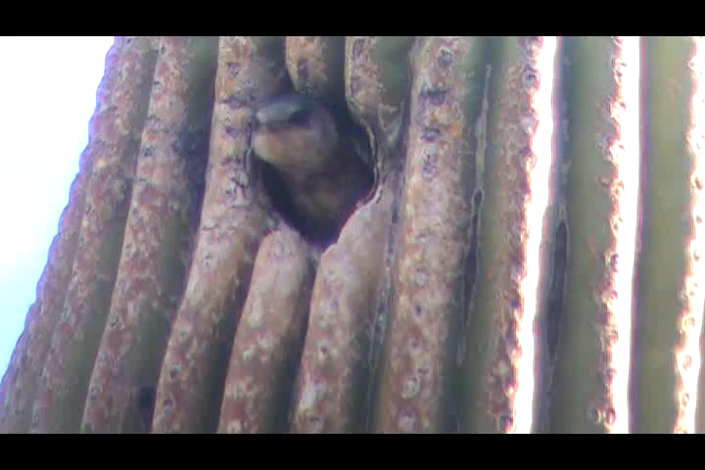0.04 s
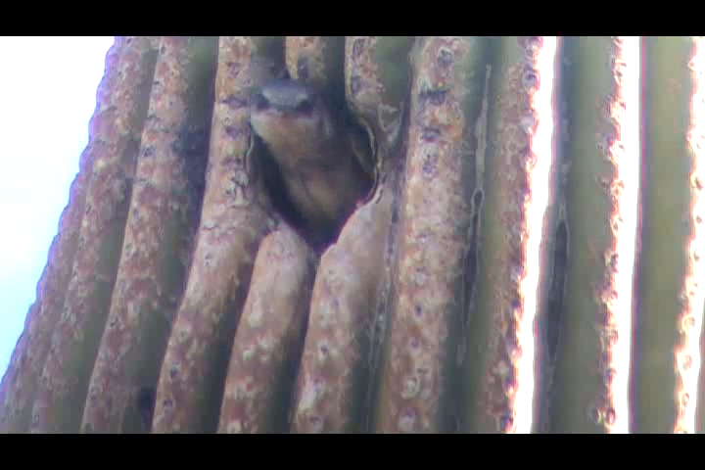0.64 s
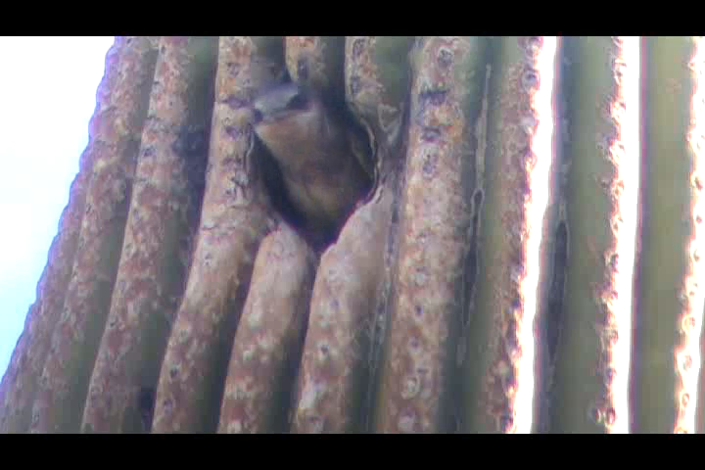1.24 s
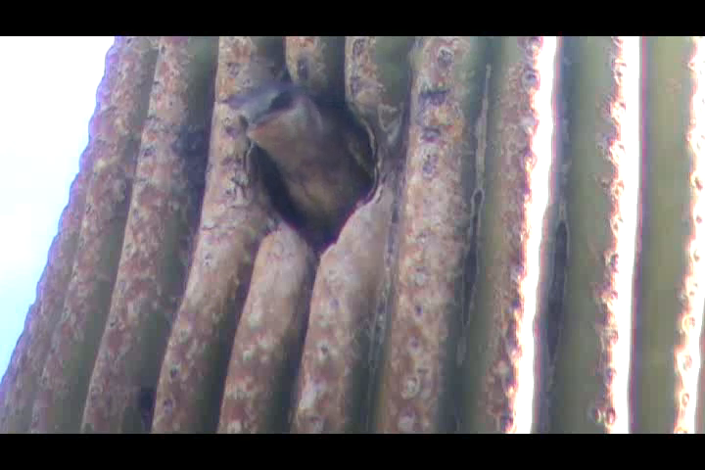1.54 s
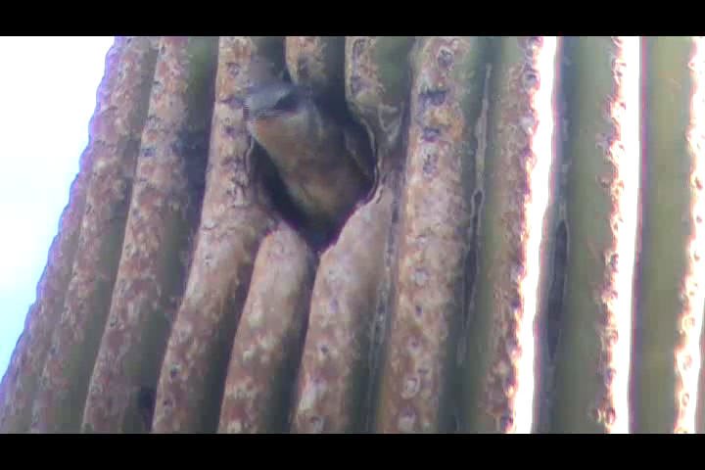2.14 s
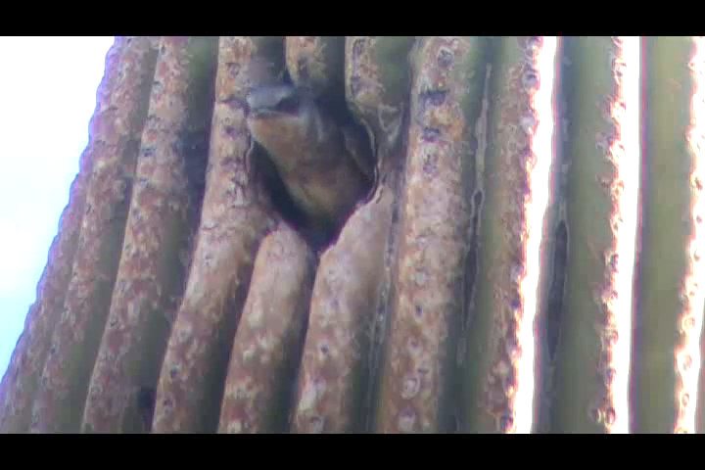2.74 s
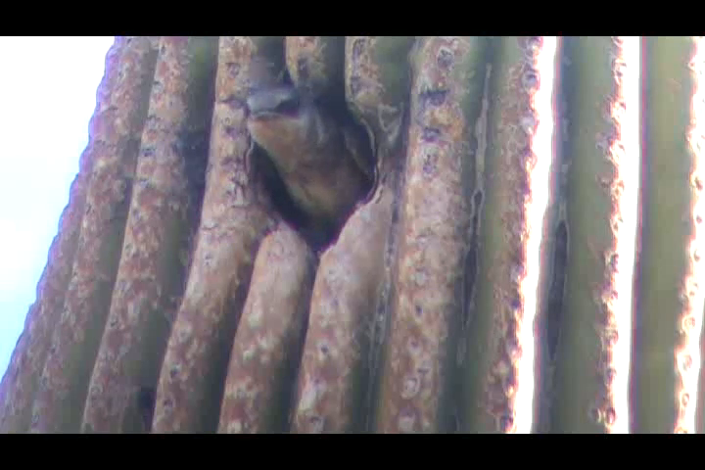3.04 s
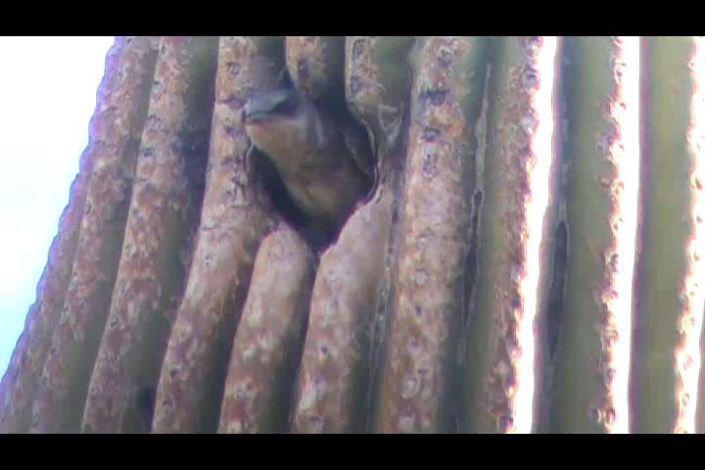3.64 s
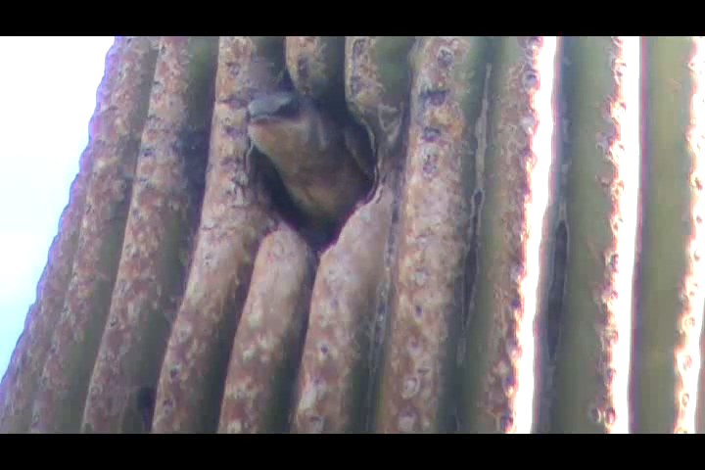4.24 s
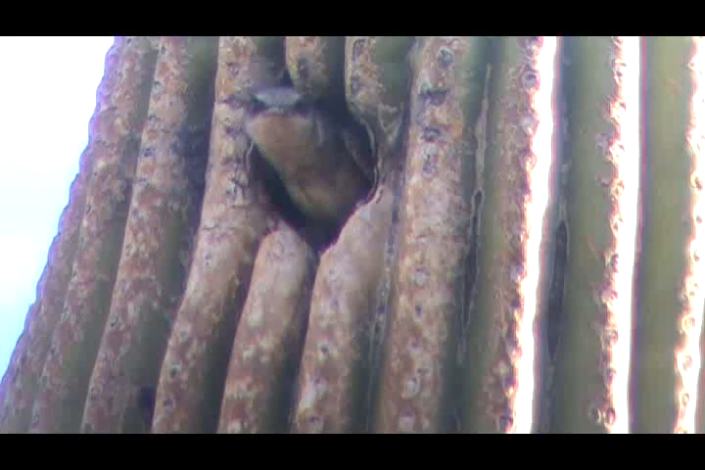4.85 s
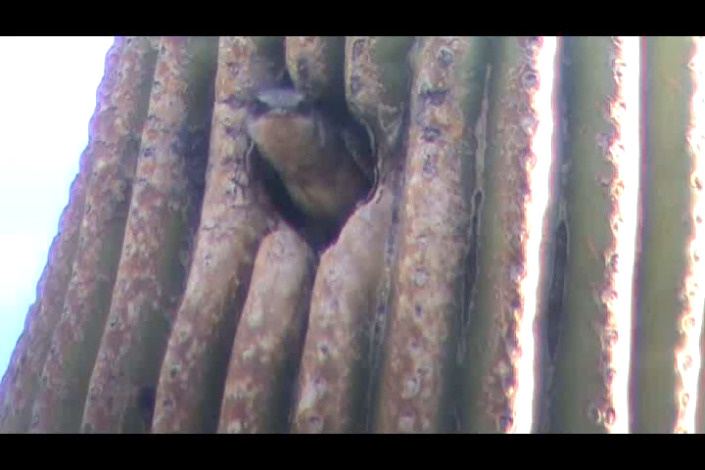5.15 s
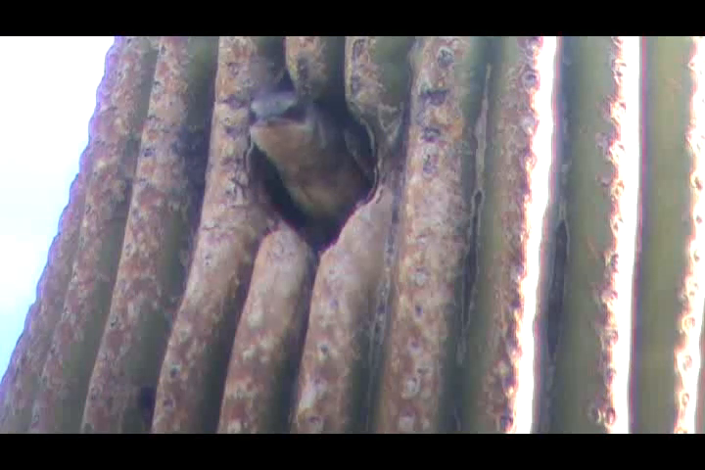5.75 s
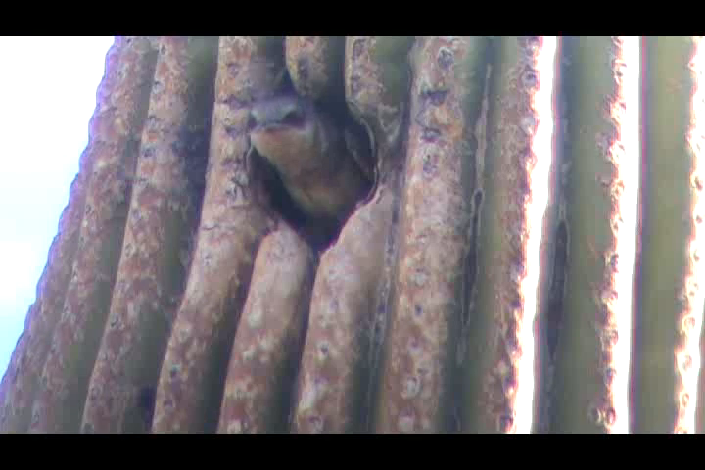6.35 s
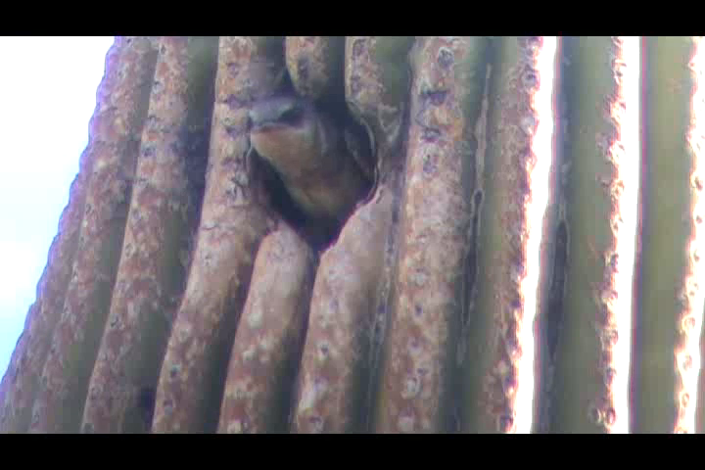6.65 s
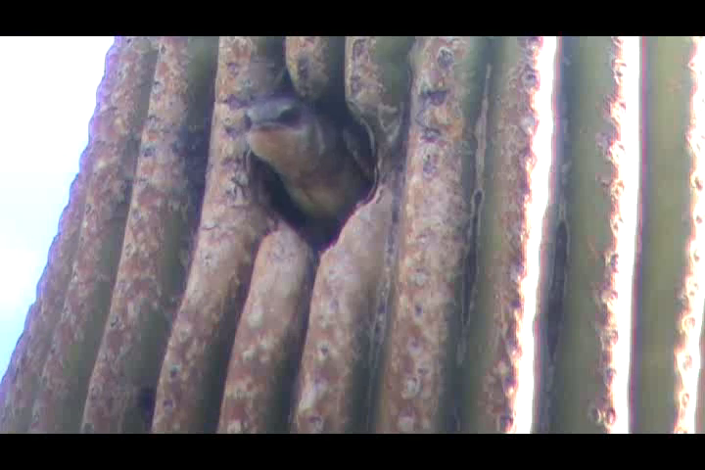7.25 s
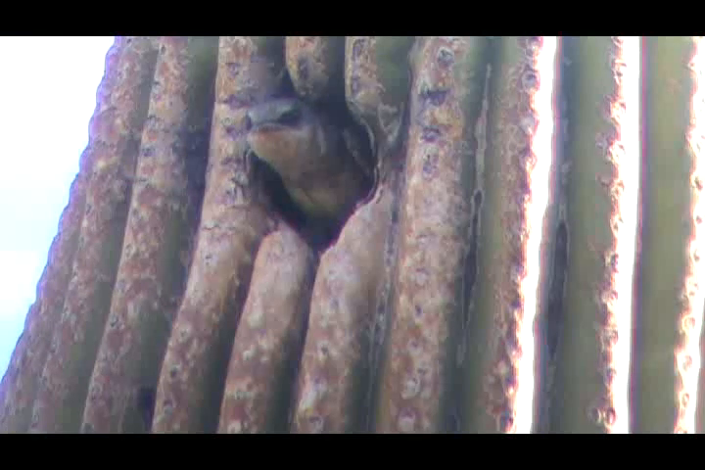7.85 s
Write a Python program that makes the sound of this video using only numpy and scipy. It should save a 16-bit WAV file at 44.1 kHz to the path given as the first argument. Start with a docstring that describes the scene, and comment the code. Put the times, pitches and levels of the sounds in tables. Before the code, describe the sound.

A nearby bird gives three sharp, high chips in the first second, each a tiny whistle that plunges in pitch. A single chip follows, then a quick pair, and a last one near the end. Other birds call faintly further off and a few thin, dry ticks sound nearby. The setting is open air with little echo, over a steady hum of distant traffic and a faint hiss.

```python
"""At a nest hole in a tall cactus, a bird gives seven sharp chips, each a held whistle that plunges at
the end. Its throat boosts whichever overtone is near 5 kHz, and the cactus ribs and the ground scatter
every chip into tiny echoes. Other birds call faintly further off and a few thin ticks sound nearby.
Behind it all are a faint hiss and the steady hum of distant traffic: rumble, tyre roar and engines."""
import sys
import numpy as np
from scipy import signal
from scipy.fft import rfft, irfft
from scipy.io import wavfile
from scipy.ndimage import uniform_filter1d

SR = 44100
rng = np.random.default_rng(int(sys.argv[2]) if len(sys.argv) > 2 else 0)


def wav_record(signal):
    """Record a signal, one row per channel, as 16-bit PCM in the file named by sys.argv[1]."""
    frames = np.transpose(np.atleast_2d(signal))
    bounded = np.clip(frames, -1, 1)
    # unit amplitude maps onto the largest positive 16-bit level
    quanta = np.round(bounded * 32767).astype(np.int16)
    wavfile.write(sys.argv[1], SR, quanta)


N = 357651
TIME = np.arange(N) / SR

# A "colour" says how strong each frequency is. Levels in a table are relative to one another.
# colour of the low traffic rumble: frequency_hz, gain_db
RUMBLE_COLOUR = [(12, -32), (25, -19), (45, -9), (70, -2.5), (115, 0.5), (160, -5.5), (230, -7), (310, -16),
                 (420, -24.5), (800, -67)]
# colour of the tyre roar: frequency_hz, gain_db
TYRE_COLOUR = [(180, -33), (300, -9.5), (412, -7), (487, -5.5), (560, -3), (824, -0.5), (1540, -9.5),
               (2810, -22.5), (3200, -28), (4160, -48.5), (7040, -120)]
# how the low and high parts of the tyre roar rise and fall: time_s, low_db, high_db
TYRE_LEVELS = [(0.0, -48, -55.5), (0.97, -46, -52.5), (2.42, -49, -53.5), (3.88, -48, -54),
               (4.56, -47.5, -52.5), (5.35, -48.5, -56), (8.11, -47, -54)]
# colour of the faint hiss: frequency_hz, gain_db
HISS_COLOUR = [(2200, -34), (3000, -1), (4000, 0.5), (6000, -3), (8000, -5.5), (10500, -5), (12000, -8)]
# how alike the background is on the left and right (1 is fully alike): frequency_hz, likeness
STEREO_LIKENESS = [(120, 1), (250, .93), (500, .9), (900, .8), (1600, .62), (3100, .25), (6000, .3),
                   (11700, .79)]
# how far the background's waves on the left run ahead of the right: frequency_hz, lead_radians
LEFT_LEAD = [(30, .05), (100, .18), (250, .42), (600, .76), (2000, .62), (5300, .05)]

# thin dry ticks: start_s, level_db
TICK_EVENTS = [(0.042, -48), (1.565, -49), (1.6043, -51), (3.0275, -51), (3.1946, -51), (3.3792, -49.5),
               (3.5678, -51), (5.3821, -48), (5.6057, -49), (5.7882, -51), (6.3149, -47)]
# colour of a tick: frequency_hz, gain_db
TICK_TONE = [(1500, -33), (4000, 1.5), (7000, -5), (10000, 2.5), (12000, 1.5)]

# the near bird's chips:
# start_s, hold_s, sag_s, start_hz, sagged_hz, before_plunge_hz, level_db, swell_db, left_over_right_db
NEAR_CHIPS = [(.258, .0132, .007, 6100, 5750, 5700, -12.5, 9, -3),
              (.6432, .0156, .013, 5900, 4960, 4960, -19.5, 0, -3),
              (.9028, .0128, .011, 6850, 5600, 5450, -11, 13, -.3),
              (2.4151, .0117, .0062, 5850, 5200, 5370, -18.8, 5, -3),
              (4.5335, .0145, .0095, 6350, 5330, 5400, -16, 6, -3.2),
              (4.778, .0143, .0098, 6550, 5450, 5220, -13.7, 8, -3.3),
              (7.0908, .013, .005, 5700, 5110, 5400, -16.7, 8, -2.6)]
# the tones in its voice, at whole multiples of the pitch: multiple, level_db
VOICE_HARMONICS = [(1, 0), (2, -3), (3, -15), (4, -22)]
# its throat favours tones near 5 kHz: frequency_hz, gain_db
THROAT_COLOUR = [(1500, -48), (2500, -32), (3300, -14), (4300, -5), (5000, 0), (6300, -.5), (7500, -9.5),
                 (9000, -14), (10500, -19), (11600, -33)]
# air rushing through the throat: frequency_hz, gain_db
BREATH_COLOUR = [(1500, 1), (3000, -9), (5000, 0.5), (7000, -3), (10000, -2.5), (12000, -41.5)]
# the beak beams treble at the cactus, so more of it comes back scattered: frequency_hz, gain_db
CACTUS_ECHO_COLOUR = [(2500, -8), (4000, -7), (5000, -14), (5800, -15), (7000, -3), (11000, -3)]
# air and brush soak up treble on the longer paths: frequency_hz, gain_db
GROUND_ECHO_COLOUR = [(4300, -10), (5500, -8.5), (6700, -13), (10000, -18.5)]

# distant engines: start_s, loudest_s, end_s, start_hz, settled_hz, settling_s, level_db
ENGINE_DRONES = [(1.4, 2.02, 3.1, 88, 101, 0.504, -48.5), (2.2, 4.7, 5.9, 110, 147, 2.4, -50),
                 (.3, 7.4, 7.4, 71.5, 76, 6.07, -52), (6.2, 6.5, 8.4, 120, 97, 0.199, -49.5)]

# far birds, sharp downward flicks: start_s, top_hz, level_db
FAR_FLICKS = [(.424, 8300, -48.5), (1.689, 8300, -47), (3.563, 7380, -44), (4.447, 7500, -45),
              (7.841, 8050, -45.5)]
# far birds, falling slides: start_s, length_s, start_hz, level_db
FAR_SLIDES = [(0.425, 0.088, 5500, -53), (1.23, .035, 6600, -55), (1.26, .09, 6200, -61.5),
              (3.661, .15, 6230, -55.5), (5.384, 0.084, 6400, -60.5), (7.665, 0.058, 6740, -61)]
# far birds, soft pips that arch over and drop: start_s, top_hz, level_db
FAR_PIPS = [(.832, 6250, -50.5), (1.173, 5880, -50), (1.64, 5570, -50), (2.256, 5240, -51),
            (2.988, 5750, -53), (3.202, 5700, -50.5), (4.087, 5820, -50.5), (6.732, 5750, -50.5),
            (7.054, 5840, -49)]
# far birds, short rising notes: start_s, length_s, level_db
FAR_RISES = [(1.073, 0.017, -49), (1.383, 0.015, -54), (5.332, 0.043, -51.5)]
# scratchy warbles of a still more distant bird: start_s, length_s, both_ends_hz, middle_hz, level_db
FAR_WARBLES = [(2.943, 0.067, 3200, 2430, -58), (5.15, 0.048, 2990, 3550, -61.5),
               (5.303, .078, 3950, 2320, -57.5), (5.73, .06, 3150, 3820, -58),
               (6.665, .04, 2700, 3400, -63), (6.731, 0.053, 2300, 3900, -55),
               (7.385, .07, 3290, 3930, -63)]
# far birds, thin and very high whistles: start_s, length_s, level_db
FAR_THIN_NOTES = [(4.3, .03, -65.5), (4.37, .06, -66), (5.06, .04, -63.5), (5.16, .05, -66),
                  (6.205, .065, -60)]


def gain_of(db):
    """Turns decibels into a number to multiply a sound by."""
    return 10 ** (np.asarray(db) / 20)


def evened(x):
    """Scales a signal so that its average power is 1."""
    return x / np.sqrt(np.mean(x ** 2) + 1e-20)


def look_up(table, hz):
    """Reads between a table's rows, giving every octave equal room."""
    frequencies, values = np.transpose(table)
    return np.interp(np.log(hz + 1), np.log(frequencies + 1), values)


def coloured(x, colour):
    """Makes each frequency in a sound stronger or weaker, as a colour table says."""
    size = x.shape[-1]
    hz = np.fft.rfftfreq(size, 1 / SR)
    return irfft(rfft(x) * gain_of(look_up(colour, hz)), size)


def add(mix, start_s, sound):
    """Mixes a sound in at its start time."""
    part = mix[..., round(start_s * SR):][..., :sound.shape[-1]]
    part += sound[..., :part.shape[-1]]


def stereo_noise(colour):
    """Noise as it reaches two points close together: partly alike, and a little earlier on the left."""
    hz = np.fft.rfftfreq(N, 1 / SR)
    a, b, c, d = rng.standard_normal((4, len(hz)))
    left, unrelated = a + 1j * b, c + 1j * d
    likeness = np.clip(look_up(STEREO_LIKENESS, hz), 0, 1)
    lag = np.exp(-1j * look_up(LEFT_LEAD, hz))
    right = (likeness * left + np.sqrt(1 - likeness ** 2) * unrelated) * lag
    return evened(irfft(np.array([left, right]) * gain_of(look_up(colour, hz)), N))


def traffic(split_hz=1150, swell_at_s=6.7, swell_half_width_s=2.4):
    """Far tyres roar, their lows and highs drifting apart; the rumble swells as heavier traffic passes."""
    roar = stereo_noise(TYRE_COLOUR)
    lows = signal.sosfiltfilt(signal.butter(4, split_hz, fs=SR, output="sos"), roar)
    times, low_db, high_db = np.transpose(TYRE_LEVELS)
    tyres = evened(lows) * gain_of(np.interp(TIME, times, low_db) + 1)
    tyres += evened(roar - lows) * gain_of(np.interp(TIME, times, high_db))
    swell = np.exp(-((TIME - swell_at_s) / swell_half_width_s) ** 2)
    rumble = stereo_noise(RUMBLE_COLOUR) * gain_of(-48 + 1.5 * swell)
    return rumble + tyres


def hiss(level_db=-61.5):
    """A faint, steady, high noise."""
    return gain_of(level_db) * stereo_noise(HISS_COLOUR)


def ticks(die_away_s=.08):
    """Tiny bright snaps of noise, each fading by 60 dB in die_away_s."""
    out, t = np.zeros((2, N)), np.arange(SR // 10) / SR
    for start_s, db in TICK_EVENTS:
        snap = evened(coloured(rng.standard_normal(len(t)), TICK_TONE))
        add(out, start_s - .001, gain_of(db - 1 - 60 * t / die_away_s) * snap)
    return out


def flutter(size, smooth_samples):
    """A fast random wobble that makes a pitch sound raspy."""
    return evened(uniform_filter1d(rng.standard_normal(size), size=smooth_samples))


def chip(hold_s, sag_s, start_hz, sagged_hz, before_plunge_hz, level_db, swell_db):
    """A whistle that sags, holds and plunges, sweeping its overtones down through the throat's boost."""
    plunge_s, halfway_down_s, low_share = .02, .0065, .25  # the pitch sinks towards a quarter
    t = np.arange(0, hold_s + plunge_s, 1 / SR)
    hold_progress = np.minimum(t / hold_s, 1)
    after_hold_s = np.maximum(t - hold_s, 0)
    plunging = np.minimum(after_hold_s / .004, 1)
    # the pitch snaps in from above, sags, drifts, then collapses and turns raspy
    snap_hz = 2500 * np.exp(-t / .0003)
    sag_hz = (start_hz - sagged_hz) * np.maximum(1 - t / sag_s, 0) ** 2
    drift_hz = (before_plunge_hz - sagged_hz) * np.sin(np.pi * np.maximum(hold_progress - .5, 0)) ** 2
    collapse = low_share + (1 - low_share) / (1 + (after_hold_s / halfway_down_s) ** 3)
    hz = snap_hz + (sagged_hz + sag_hz + drift_hz) * collapse
    rasp = .025 * plunging * flutter(len(t), smooth_samples=14)
    phase = 2 * np.pi * np.cumsum(hz * (1 + rasp)) / SR
    # the held part varies in strength from chip to chip; the plunge is always pushed alike
    held_db = level_db + swell_db * (np.sin(np.pi * hold_progress / 2) - 1)
    voice_break_db = -6.3 * np.exp(-((after_hold_s - .0052) / .0018) ** 2)
    plunge_db = -14.6 - 17 * (after_hold_s / plunge_s) ** 2 + voice_break_db
    pressure = gain_of((1 - plunging) * held_db + plunging * plunge_db)
    voice = np.zeros(len(t))
    for multiple, db in VOICE_HARMONICS:
        tone_hz = multiple * hz
        in_range = tone_hz < SR / 2
        voice += gain_of(db + look_up(THROAT_COLOUR, tone_hz)) * in_range * np.sin(multiple * phase)
    breath = gain_of(-30) * evened(coloured(rng.standard_normal(len(t)), BREATH_COLOUR))
    fade_in = np.minimum(t / .004, 1) ** .7
    return pressure * (fade_in * voice + breath)


def scatter(sound, delay_s, die_away_s, likeness):
    """A cloud of small echoes, partly alike left and right, that fades by 60 dB in die_away_s."""
    t = np.arange(SR // 2) / SR
    common, left, right = rng.standard_normal((3, len(t)))
    echoes = np.sqrt(likeness) * common + np.sqrt(1 - likeness) * np.array([left, right])
    echoes *= gain_of(-60 * t / die_away_s) * (t > delay_s)
    return signal.fftconvolve(sound, echoes / np.linalg.norm(echoes[0]), axes=1)[:, :N]


def near_bird():
    """The chips, their quick echoes off the cactus ribs, and a faint tail from the open ground."""
    direct = np.zeros((2, N))
    for start_s, *shape, left_over_right_db in NEAR_CHIPS:
        sides = gain_of([[left_over_right_db / 2], [-left_over_right_db / 2]])
        add(direct, start_s, sides * chip(*shape))
    to_cactus = coloured(direct, CACTUS_ECHO_COLOUR)
    to_ground = coloured(to_cactus, GROUND_ECHO_COLOUR)
    ribs = scatter(to_cactus, delay_s=.002, die_away_s=.075, likeness=.7)
    ground = scatter(to_ground, delay_s=.022, die_away_s=.33, likeness=.9)
    return direct + ribs + ground


def engines(waver_db=2, faint_db=-12.5):
    """Each engine's firing makes a hum that settles towards a new pitch as it swells, wavers and fades."""
    out = np.zeros(N)
    waver_rates_hz = np.geomspace(.7, 4, num=8)
    for start_s, loudest_s, end_s, start_hz, settled_hz, settling_s, db in ENGINE_DRONES:
        hz = settled_hz + (start_hz - settled_hz) * np.exp(-np.maximum(TIME - start_s, 0) / settling_s)
        hum = np.sin(2 * np.pi * np.cumsum(hz) / SR)
        passing_db = np.interp(TIME, [start_s, loudest_s, end_s], [faint_db, 0, faint_db])
        waver = evened(sum(np.sin(2 * np.pi * (rate * TIME + rng.random())) for rate in waver_rates_hz))
        running = uniform_filter1d(1. * (TIME > start_s) * (TIME < end_s), size=8000)  # soft on and off
        out += running * gain_of(db + passing_db + waver_db * waver) * hum
    return out


def bend(length_s, start_hz, middle_hz, end_hz):
    """A smooth path through three pitches."""
    curve = np.polyfit([0, .5, 1], [start_hz, middle_hz, end_hz], 2)
    return np.polyval(curve, np.linspace(0, 1, round(length_s * SR)))


def whistle(hz, rasp, fade_db_per_s=110):
    """A bird's note along a fluttering pitch path; a negative fade makes it grow louder."""
    t = np.arange(len(hz)) / SR
    raspy_hz = hz * (1 + rasp * flutter(len(t), smooth_samples=24))
    loudness = signal.windows.tukey(len(t), .3) * gain_of(-fade_db_per_s * (t - t.mean()))
    return loudness * np.sin(2 * np.pi * np.cumsum(raspy_hz) / SR)


def far_calls(slide_low_hz=4380, slide_sink_s=.026, rise_hz=(5300, 6260), thin_hz=10130):
    """Gives each far call as (start_s, level_db, sound); every kind has its own shape and rasp."""
    for start_s, top_hz, db in FAR_FLICKS:
        path = top_hz * bend(.019, 1, .83, .41)
        yield start_s, db, whistle(path, rasp=.035, fade_db_per_s=-150)
    for start_s, top_hz, db in FAR_PIPS:
        yield start_s, db, whistle(top_hz * bend(.022, .79, 1, .635), rasp=.06)
    for start_s, length_s, start_hz, db in FAR_SLIDES:
        sink = np.exp(-np.arange(0, length_s, 1 / SR) / slide_sink_s)
        path = slide_low_hz + (start_hz - slide_low_hz) * sink
        yield start_s, db, whistle(path, rasp=.012, fade_db_per_s=130)
    for start_s, length_s, db in FAR_RISES:
        yield start_s, db, whistle(np.linspace(*rise_hz, round(length_s * SR)), rasp=.012)
    for start_s, length_s, db in FAR_THIN_NOTES:
        yield start_s, db, whistle(np.full(round(length_s * SR), thin_hz), rasp=.008)
    for start_s, length_s, ends_hz, middle_hz, db in FAR_WARBLES:
        yield start_s, db, whistle(bend(length_s, ends_hz, middle_hz, ends_hz), rasp=.05)


def far_birds():
    """The far calls and a rattle, blurred by echoes from the brush and the ground."""
    calls = np.zeros((2, N))
    for start_s, db, call in [*far_calls(), *far_rattle()]:
        add(calls, start_s, gain_of(db) * call)
    brush = gain_of(-2) * scatter(calls, delay_s=.0021, die_away_s=.079, likeness=.4)
    ground = gain_of(-9.5) * scatter(calls, delay_s=.023, die_away_s=.64, likeness=.47)
    return gain_of(-5.5) * calls + brush + ground


def far_rattle(start_s=7.86, notes_per_s=40.3, count=8, note_s=.0125):
    """A far bird's quick run of raspy falling notes, which sets off a little lower and softer."""
    for note in range(count):
        setting_off = np.exp(-note / 2)
        path = (6100 - 800 * setting_off) * bend(note_s, .88, .88, .38)
        db = -47 - 2.5 * setting_off
        yield start_s + note / notes_per_s, db, whistle(path, rasp=.07)


def scene():
    """Birds and ticks over the traffic and a faint hiss."""
    return near_bird() + far_birds() + ticks() + traffic() + engines() + hiss()


def record(dry):
    """Cuts away the very highest treble."""
    cutoff_hz = 12150
    low_pass = signal.firwin(511, cutoff_hz, window=("kaiser", 9), fs=SR)
    return signal.oaconvolve(dry, low_pass[None], "same")


dry = scene()
out = record(dry)
wav_record(out)
```